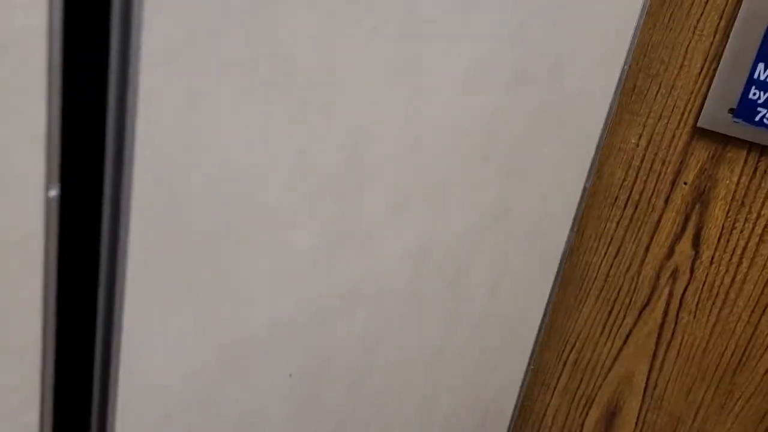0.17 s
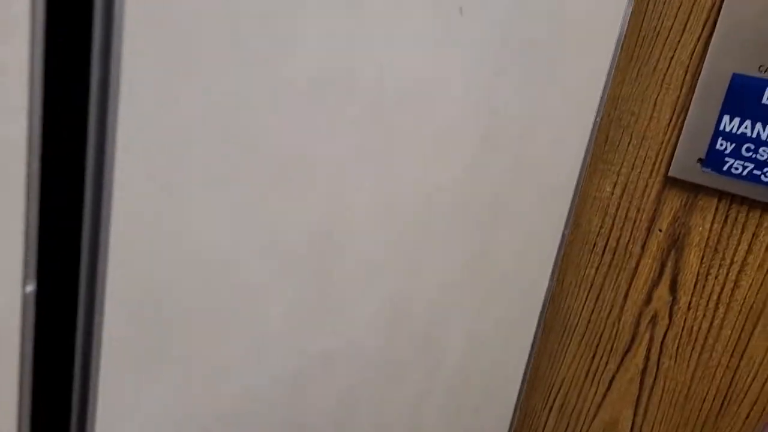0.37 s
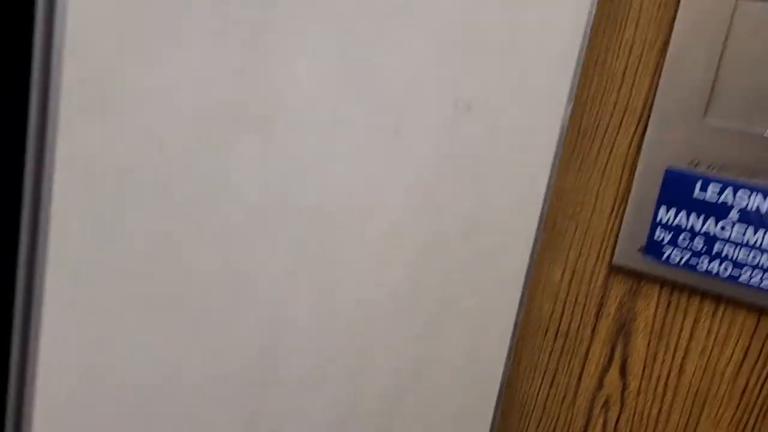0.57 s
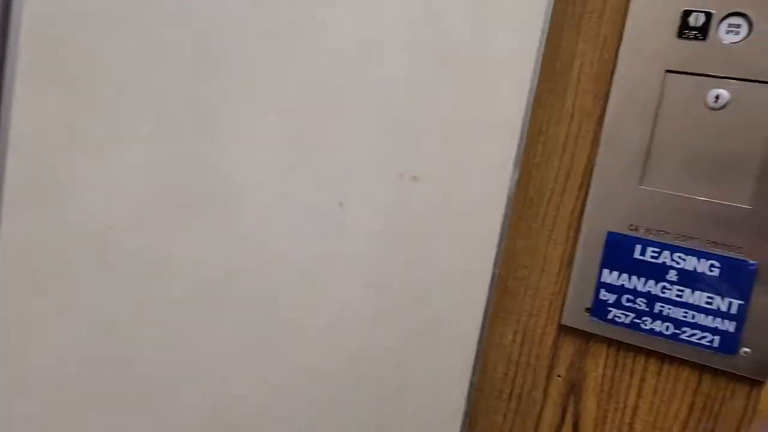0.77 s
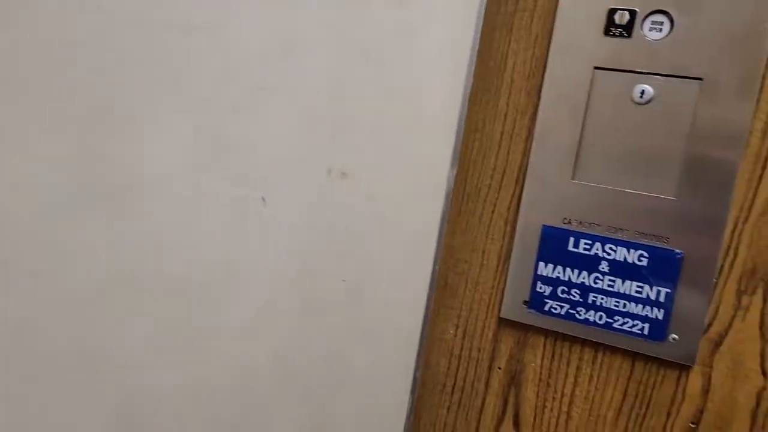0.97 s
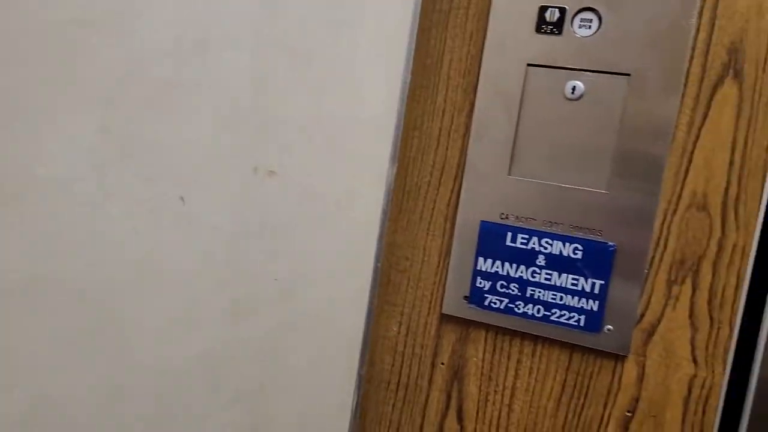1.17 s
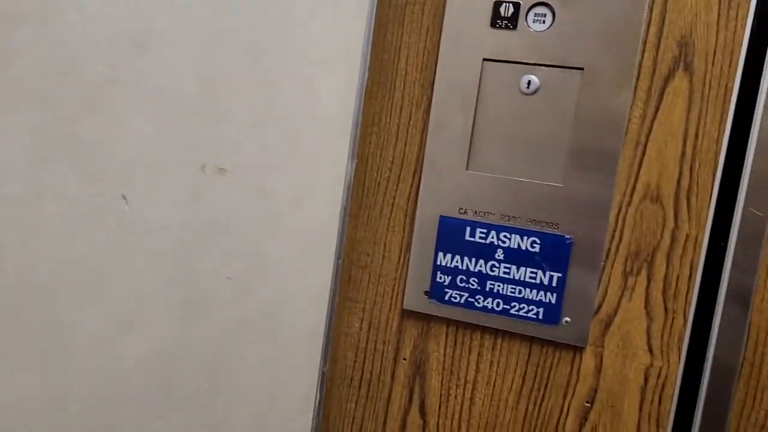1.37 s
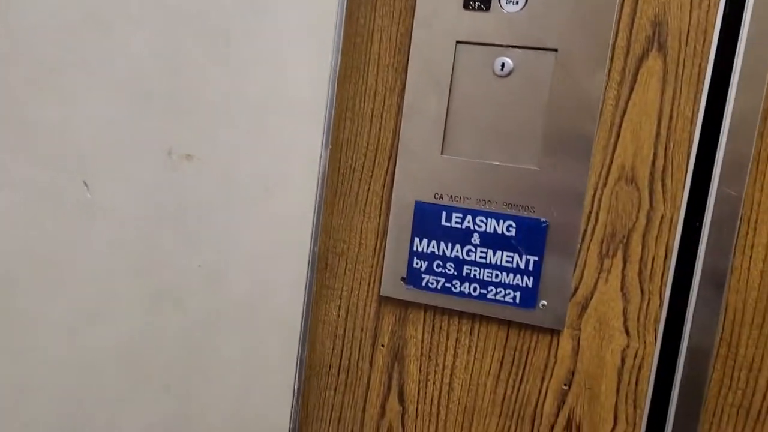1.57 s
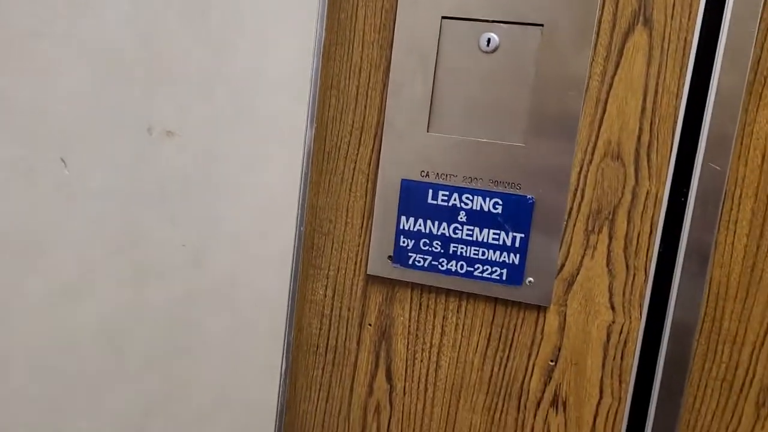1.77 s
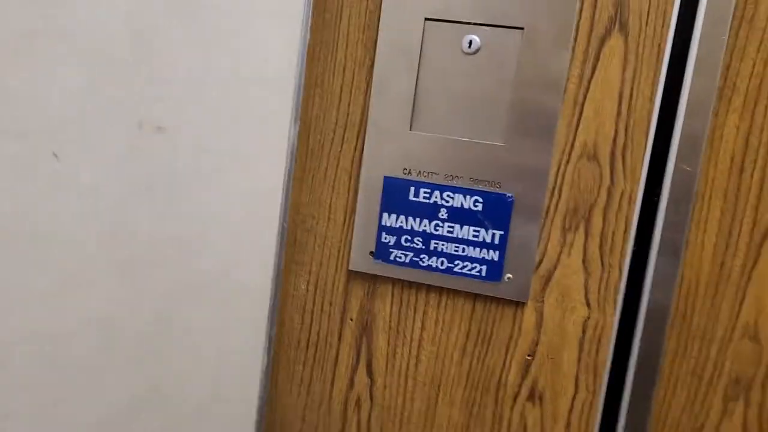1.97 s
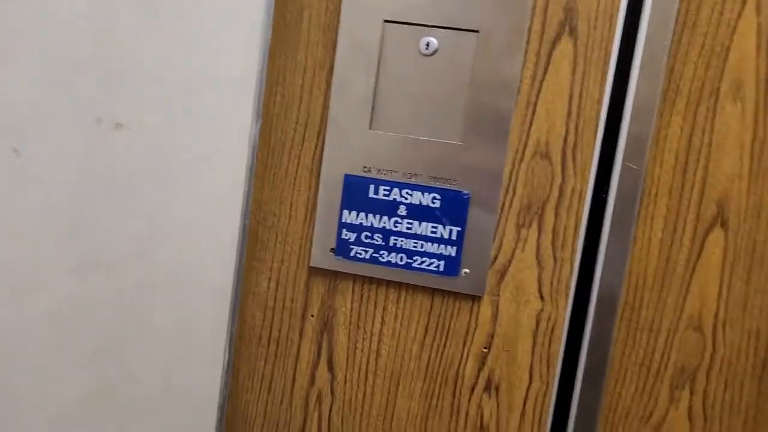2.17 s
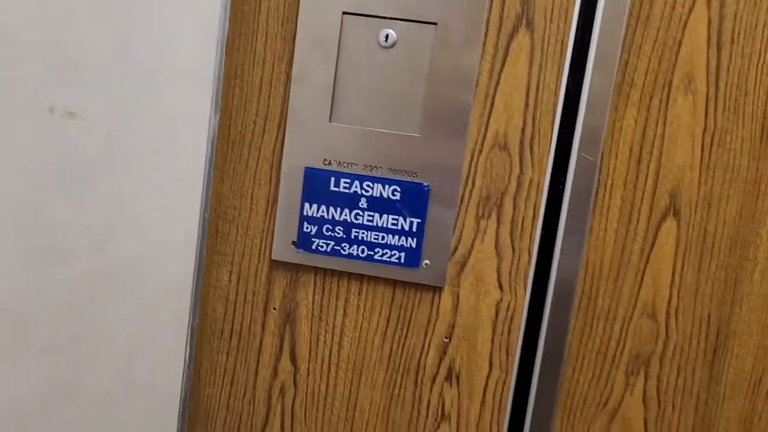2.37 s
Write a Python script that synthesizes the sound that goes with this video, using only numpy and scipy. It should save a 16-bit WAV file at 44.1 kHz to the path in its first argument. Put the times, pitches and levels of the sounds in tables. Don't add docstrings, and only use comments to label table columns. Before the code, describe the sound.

Old lift door mechanism knocking and clacking, with low motor rumble sinking to near silence between

```python
import sys
import numpy as np
from scipy import signal
from scipy.fft import rfft, irfft
from scipy.io import wavfile
from scipy.ndimage import uniform_filter1d

SR = 44100
rng = np.random.default_rng(int(sys.argv[2]) if len(sys.argv) > 2 else 0)


def gain_from_db(level_db):
    decades = np.asarray(level_db, float) / 20
    return 10 ** decades


def generate_wav(signal):
    frames = np.transpose(np.atleast_2d(signal))
    scaled = np.clip(frames, -1, 1) * 32767
    pcm = np.round(scaled).astype(np.int16)
    wavfile.write(sys.argv[1], SR, pcm)


N = 105840
T = np.arange(N) / SR
F = np.maximum(np.arange(N // 2 + 1) * SR / N, 1)


def curve(table, col=1):
    table = np.array(table)
    return np.interp(T, table[:, 0], table[:, col])


def over_hz(table):
    table = np.array(table)
    return np.interp(np.log(F), np.log(table[:, 0]), table[:, 1])


def unit(x):
    return x / np.sqrt(np.mean(x ** 2))


def walk(rate_hz):
    k = int(SR / rate_hz)
    steps = np.repeat(rng.standard_normal(N // k + 1), k)
    smooth = uniform_filter1d(uniform_filter1d(steps, k), k)
    return unit(smooth[:N])


def peak(x, hz, width_hz):
    return signal.lfilter(*signal.iirpeak(hz, hz / width_hz, fs=SR), x)


def resonance(x, hz, width_1_hz, width_2_hz):
    return unit(peak(peak(x, hz, width_1_hz), hz, width_2_hz))


def noise(spectrum_db):
    return unit(irfft(rfft(rng.standard_normal(N)) * gain_from_db(spectrum_db), N))


def add_mode(out, start_s, level_db, pitch_hz, t60_s, rise_s, phase):
    k = int(start_s * SR)
    u = T[k + 1:k + int(1.3 * t60_s * SR)] - start_s
    ring = np.sin(2 * np.pi * pitch_hz * u + phase)
    onset = (1 - np.exp(-u / rise_s)) ** 2
    out[k + 1:k + 1 + len(u)] += gain_from_db(level_db - 60 * u / t60_s) * ring * onset


def struck(hits, modes, rise_s, pan_db, spread_rad):
    scatter_db, detune = 1.5, .002
    out = np.zeros((2, N))
    luck = rng.standard_normal((len(hits), len(modes), 3))
    for (start_s, hit_db), row in zip(hits, luck):
        for (hz, mode_db, t60_s), (a, b, c) in zip(modes, row):
            level_db = hit_db + mode_db + scatter_db * a
            pitch_hz = hz * (1 + detune * b)
            for port, side in zip(out, (.5, -.5)):
                phase = side * spread_rad * np.tanh(c)
                add_mode(port, start_s, level_db + side * pan_db, pitch_hz, t60_s, rise_s, phase)
    return out


# start_s, level_db, pitch_hz, t60_s
FRAME_THUDS = [(.002, -42.5, 114, 0.33), (.09, -49, 298, .12), (0.26, -15, 310, 0.033),
               (0.233, -30, 192, 0.1), (.277, -28, 116, 0.11), (0.281, -33, 287, 0.12),
               (0.304, -26, 50.6, 0.14), (.304, -27.5, 293, 0.16), (.3, -22, 180, 0.12),
               (0.323, -30.5, 121, .07), (.345, -27, 140, .06), (.36, -25, 186, 0.13),
               (0.361, -37, 270, 0.041), (.412, -28, 293.3, 0.1), (0.4242, -29.5, 115, 0.32),
               (0.441, -48, 115, 0.44), (0.4574, -32.5, 115, 0.26), (.445, -28.5, 272, .14),
               (0.484, -31, 267.4, 0.11), (.535, -37.5, 253, 0.32), (0.586, -38, 260.5, 0.23),
               (.615, -44, 115, 0.18), (0.705, -30, 282.5, 0.066), (0.719, -38, 50, 0.13),
               (.752, -36.5, 266, .12), (0.833, -30.5, 123, .12), (0.858, -28, 275.5, 0.055),
               (0.877, -27.5, 165, 0.066), (0.902, -32, 263, 0.079), (0.909, -39, 145, 0.43),
               (.945, -33.5, 264.5, .12), (0.956, -43, 145, 0.43), (1.444, -47, 112, 0.26),
               (1.554, -34.5, 44.2, 0.25), (1.545, -24, 306, 0.066), (1.563, -33.5, 115, 0.16),
               (1.575, -34.5, 296, 0.088), (1.612, -44, 128, 0.12), (1.806, -41, 145, 0.24),
               (1.884, -25, 416, 0.031), (1.885, -25.5, 293, .03), (1.884, -35.5, 526, 0.042),
               (1.884, -41.5, 657, 0.033), (1.889, -37, 60, 0.088), (1.994, -45.5, 115, 0.66),
               (2.26, -43.5, 141, 0.19)]


def thuds():
    out = np.zeros(N)
    for start_s, level_db, pitch_hz, t60_s in FRAME_THUDS:
        add_mode(out, start_s, level_db, pitch_hz, t60_s, rise_s=.003, phase=0)
    return out


# start_s, level_db
LATCH_STRIKES = [
    (.2195, -39),
    (.2245, -33),
    (.2345, -35),
    (.244, -36),
    (.255, -40),
    (.279, -41.5),
    (.293, -41.5),
]
# pitch_hz, level_db, t60_s
LATCH_MODES = [(1850, -14, .07), (2068, -1, .08), (2102, 0, .09), (2200, -6, .06), (2320, -8, .05),
               (2750, -7, .06), (2900, -8, .05), (3100, -10, .05), (4500, -13, .06), (4750, -11, .05),
               (6901, -16, .09), (7445, -15, .07)]


def latch():
    return struck(LATCH_STRIKES, LATCH_MODES, rise_s=.00061, pan_db=-8.5, spread_rad=1.9)


# start_s, level_db
CATCH_STRIKES = [
    (.8118, -38),
]
# pitch_hz, level_db, t60_s
CATCH_MODES = [(930, -2, .07), (1110, -10, .12), (1390, -6, .1), (2110, -1, .12), (2480, -8, .12),
               (3080, -3, .14), (3920, -1, .055), (4690, -9, .03), (6870, -10, .04), (7460, -9, .05),
               (7880, -8, .05), (3960, -11, .15)]


def catch():
    return struck(CATCH_STRIKES, CATCH_MODES, rise_s=.00029, pan_db=1.5, spread_rad=2.6)


# start_s, level_db
LEAF_STRIKES = [
    (.666, -54.5),
    (.795, -57.5),
    (.8472, -42),
    (.858, -46.5),
    (.869, -42.5),
    (.879, -45.5),
    (.888, -50),
    (.902, -54),
    (.918, -55),
]
# pitch_hz, level_db, t60_s
LEAF_MODES = [(870, -5, 0.084), (1073, -2.5, 0.19), (1221, -1.5, 0.14), (1570, -4.5, 0.1),
              (1832, -3, 0.079), (2100, 5, 0.044), (2536, 3, 0.032), (2950, -9, .05)]


def leaf():
    return struck(LEAF_STRIKES, LEAF_MODES, rise_s=.00065, pan_db=-.6, spread_rad=1.8)


# start_s, level_db
ROLLER_BUMPS = [(1.758, -43), (1.81, -46), (1.915, -48), (1.965, -44.5), (2.005, -40.5), (2.048, -38),
                (2.09, -37), (2.115, -42), (2.145, -36.5), (2.193, -37.5), (2.228, -39.5), (2.262, -40.5),
                (2.312, -44), (2.352, -48), (2.388, -42)]
# pitch_hz, level_db, t60_s
TRACK_MODES = [(251.7, -2, 0.1), (298.6, 6.5, 0.091), (345, -0.5, 0.085), (439, -3, 0.071),
               (523, -9.5, 0.092)]


def rollers():
    return struck(ROLLER_BUMPS, TRACK_MODES, rise_s=.006, pan_db=1.2, spread_rad=.66)


# start_s, level_db
PLATE_STRIKES = [
    (1.44, -56),
    (1.448, -55),
    (1.457, -49),
    (1.465, -52),
    (1.473, -50),
    (1.483, -53),
]
# pitch_hz, level_db, t60_s
PLATE_MODES = [(1060, -9, .05), (3400, -8, .025), (3690, 0, .05), (3950, -4, .03), (4290, -6, .03)]


def plate():
    return struck(PLATE_STRIKES, PLATE_MODES, rise_s=.00064, pan_db=.2, spread_rad=1.4)


# start_s, level_db, rise_s, t60_s, brightness_db_per_octave
GEAR_SCRAPES = [(0.091, -58, .002, 0.67, 7.5), (0.102, -52, 0.016, 0.3, -4), (0.216, -39, 0.012, 0.51, 2.5),
                (0.269, -38, 0.021, 0.44, -2), (0.408, -51.5, 0.071, 0.33, 4),
                (0.666, -54.5, 0.004, 0.37, 0.5), (0.766, -57, 0.02, 0.53, 0),
                (0.8118, -42.5, 0.00094, 0.21, 0.5), (0.814, -40, 0.061, 0.34, 0),
                (1.436, -60.5, 0.0018, 0.52, 2), (1.461, -54.5, .003, 0.82, 5.5),
                (1.49, -53, 0.031, 0.25, 2), (1.538, -31, .004, .27, 4), (1.56, -38.5, 0.023, 0.28, -4),
                (2.3955, -55.5, .001, .1, -8.5)]
# start_s, level_db, rise_s, t60_s, brightness_db_per_octave
RELAY_TICKS = [
    (.6655, -44, .0005, .022, 1.5),
    (1.8845, -58, .0003, .009, 4.),
    (2.194, -61, .0003, .009, 0.),
]
# pitch_hz, density_db_per_hz
SCRAPE_SPECTRUM = [(240, -42.5), (400, -4), (654, -13), (1170, -12), (1780, -17), (2110, -14),
                   (2270, -14.5), (7320, -25.5), (15800, -36)]
# pitch_hz, width_hz, lift_db
PANEL_MODES = [(376.5, 16, 6.5), (442, 72, 0), (550, 20, 9.5), (828, 14, 8.5), (965, 30, 7), (1220, 10, 5),
               (1885, 130, 5), (2063, 110, -2), (2740, 64, -2.5), (4030, 50, 2), (7560, 380, 5.5)]


def scrapes():
    treble_hz, treble_decay, fall_curl = 3900, .55, 1.253
    grit_db, grit_hz, longest_t60_s = 1.5, 400, .45
    panel_db = sum(lift_db / (1 + (2 * (F - hz) / width_hz) ** 2) for hz, width_hz, lift_db in PANEL_MODES)
    out = 0
    for start_s, level_db, rise_s, t60_s, tilt_db in GEAR_SCRAPES + RELAY_TICKS:
        u = np.maximum(T - start_s, 0)
        fall_db = -60 * (np.maximum(u - rise_s, 0) / min(t60_s, longest_t60_s)) ** fall_curl
        burst = noise(over_hz(SCRAPE_SPECTRUM) + panel_db + tilt_db * np.log2(F / 2000))
        low = signal.lfilter(*signal.butter(1, treble_hz, fs=SR), burst)
        burst = low * gain_from_db(fall_db) + (burst - low) * gain_from_db(fall_db / treble_decay)
        rise = np.sin(np.pi / 2 * np.minimum(u / rise_s, 1)) ** 2
        out = out + rise * gain_from_db(level_db + grit_db * walk(grit_hz)) * burst
    return out


# start_s, level_db, sway_db, panels_db
CAR_SHAKE = [(0, -45, 6, 4), (.2, -53, -13, -4), (.225, -44.5, 1, 3), (.3, -32.5, 5, 1.5),
             (.39, -37, 0, 2.5), (.47, -41.5, 5.5, 10.5), (.52, -47, 7, 4), (.78, -46, -2.5, -2.5),
             (.87, -44.5, -3, 7), (1.0, -50, 5.5, 6), (1.17, -58.5, 5.5, -5), (1.24, -53.5, 6, -3),
             (1.42, -63.5, -4, -9), (1.45, -47, -10, -3), (1.56, -41.5, 2, 3), (1.68, -50, 4, 1),
             (2.28, -50.5, -4, 1.5), (2.4, -50, -14, -7)]
# pitch_hz, width_hz, level_db
CAR_MODES = [(37, 16.7, -4.5), (50.7, 52, -4.5), (115, 11.6, 2.5), (145, 10, -4), (182.7, 6.3, -6.5),
             (239.4, 11, -4), (264.1, 6.4, -2.5), (286.7, 12.5, -2.5), (342.1, 21, -8), (388.4, 34, -12),
             (456, 25.5, -12), (590, 87, -17), (655, 91, -28.5)]


def car():
    shaft_hz, jitter_turns, scatter_db, shaft_db = 29.1, .07, 3.5, -6.5
    at = np.cumsum(1 + jitter_turns * rng.standard_normal(100)) * SR / shaft_hz
    jolts = np.zeros(N)
    jolts[at[at < N].astype(int)] = gain_from_db(scatter_db * rng.standard_normal(100))[at < N]
    drive = gain_from_db(shaft_db) * unit(jolts) + rng.standard_normal(N)
    parts = []
    for hz, width_hz, level_db in CAR_MODES:
        swell = gain_from_db(level_db + 1.83 * walk(7.19))
        parts.append(swell * resonance(drive, hz, 1.56 * width_hz, 1.56 * width_hz))
    sway, hum, panels = sum(parts[:2]), sum(parts[2:5]), sum(parts[5:])
    mix = hum + gain_from_db(curve(CAR_SHAKE, 2)) * sway + gain_from_db(curve(CAR_SHAKE, 3)) * panels
    return gain_from_db(curve(CAR_SHAKE)) * mix / 2


# start_s, level_db, belt_db
FAN_LEVEL = [(0, -62, -65), (.08, -70, -100), (.2, -69.5, -96), (.6, -66, -75), (.76, -73.5, -81),
             (1.05, -75, -66.5), (1.2, -85.5, -75), (1.3, -90.5, -85.5), (1.42, -102, -91),
             (1.78, -104, -99), (1.87, -105, -86), (1.9, -71, -72), (2.1, -75, -74), (2.22, -79, -83.5),
             (2.33, -88.5, -99), (2.4, -90, -95)]
# pitch_hz, density_db_per_hz
FAN_SPECTRUM = [(350, -36.5), (600, -9), (892, -14.5), (1790, -16.5), (2110, -18), (3270, -61),
                (4020, -23.5), (15800, -33.5)]
# pitch_hz, width_hz, level_db
HOUSING_MODES = [(1480, 300, -5), (2200, 900, -1), (3940, 420, -10), (7000, 2400, -8)]


def fan():
    belt_hz, belt_width_hz = 2130, 260
    housing = 0
    for hz, width_hz, level_db in HOUSING_MODES:
        housing = housing + gain_from_db(level_db) * resonance(rng.standard_normal(N), hz, width_hz, 2 * width_hz)
    belt = resonance(rng.standard_normal(N), belt_hz, belt_width_hz, 2 * belt_width_hz)
    whir = gain_from_db(curve(FAN_LEVEL) + walk(13)) * (noise(over_hz(FAN_SPECTRUM)) + housing)
    return whir + gain_from_db(curve(FAN_LEVEL, 2)) * belt


# pitch_hz, likeness_0_to_1
PORT_LIKENESS = [(40, 0.96), (90, 1), (250, 0.8), (600, 0.33), (2000, 0.11), (12000, 0.31)]
# pitch_hz, difference_db
PORT_TILT = [(30, -10.5), (60, 1), (130, 2), (300, 1), (600, -1), (2100, 0), (5000, -1.5), (12000, 1.5)]


def scene():
    lag_s = .00018
    near, far = (rfft(car() + fan() + scrapes()) for _ in range(2))
    near = near + rfft(thuds())
    likeness = np.clip(over_hz(PORT_LIKENESS), 0, 1)
    turn = gain_from_db(over_hz(PORT_TILT) / 2) * np.exp(-1j * np.pi * F * lag_s)
    shared = np.sqrt((1 + likeness) / 2) * near
    apart = np.sqrt((1 - likeness) / 2) * far
    ports = np.array([irfft((shared + apart) * turn, N), irfft((shared - apart) / turn, N)])
    return ports + latch() + catch() + leaf() + plate() + rollers()


def band_limit(x):
    return signal.sosfilt(signal.butter(12, 16800, fs=SR, output="sos"), x)


def record(dry):
    hiss_db, top_hz = -84, 15830
    wet = dry + gain_from_db(hiss_db) * rng.standard_normal(dry.shape)
    low_pass = signal.ellip(10, .3, 70, top_hz, fs=SR, output="sos")
    mix = signal.sosfilt(low_pass, wet)
    return band_limit(mix)


dry = scene()
out = record(dry)
generate_wav(out)
```